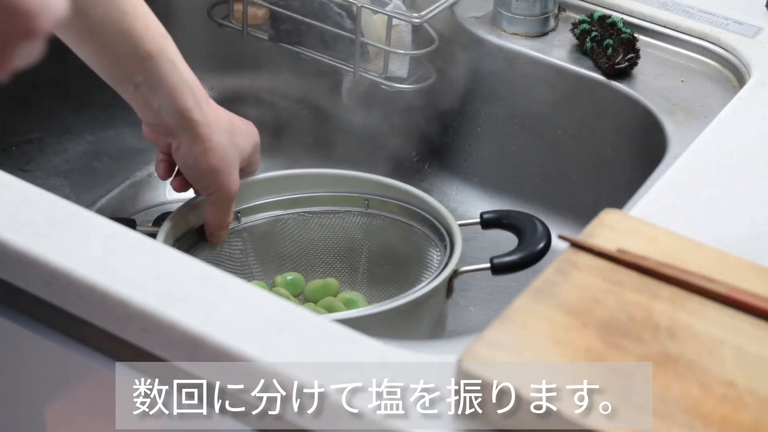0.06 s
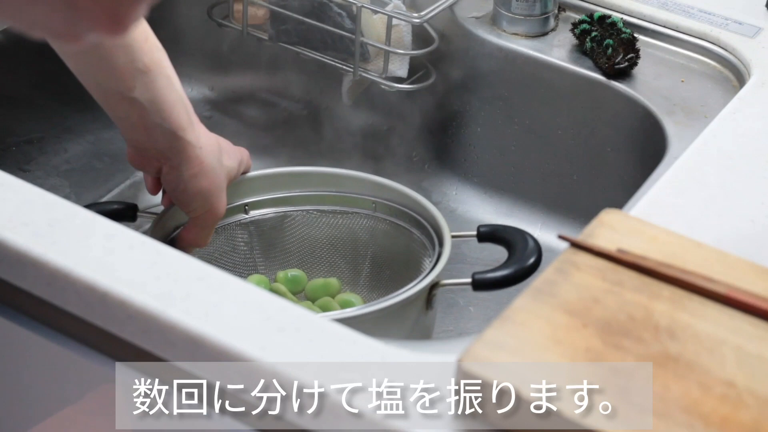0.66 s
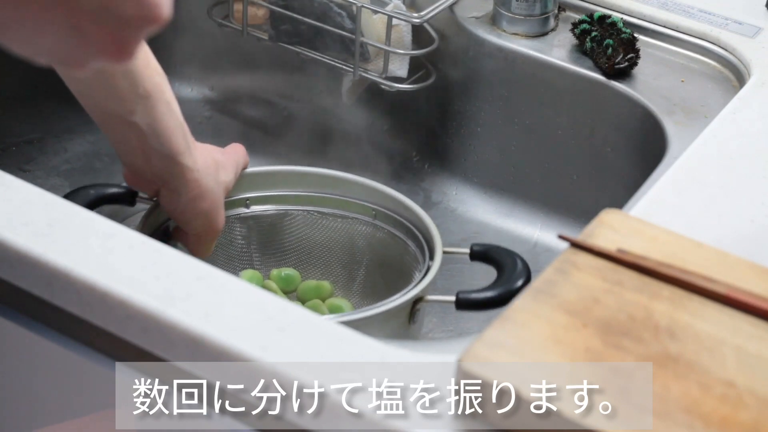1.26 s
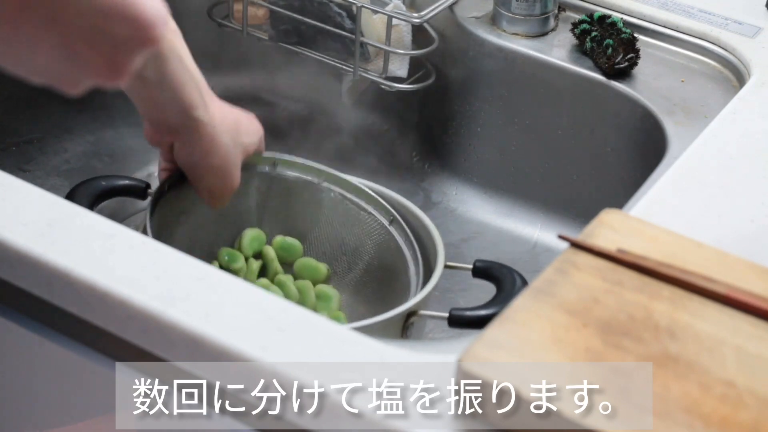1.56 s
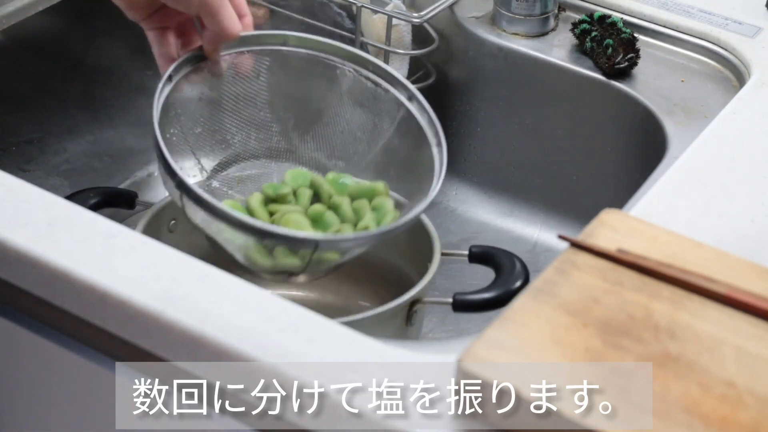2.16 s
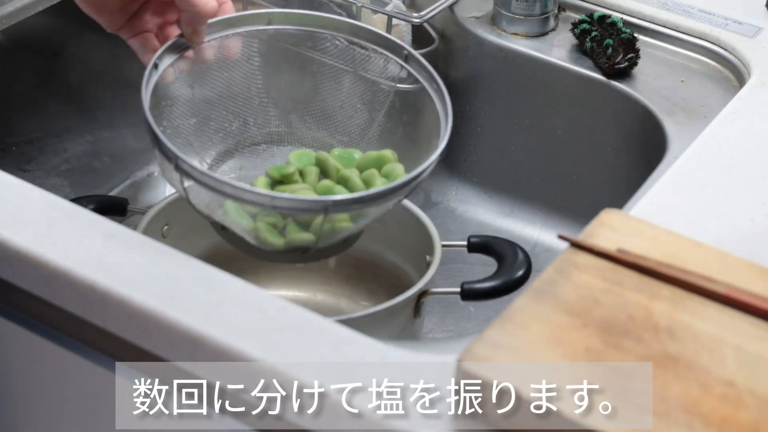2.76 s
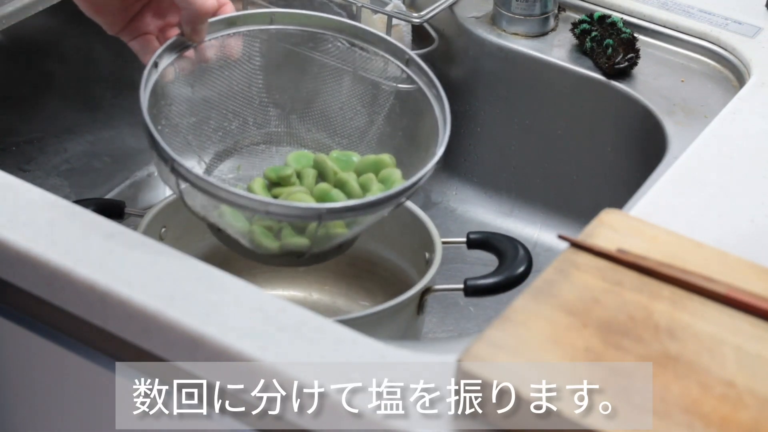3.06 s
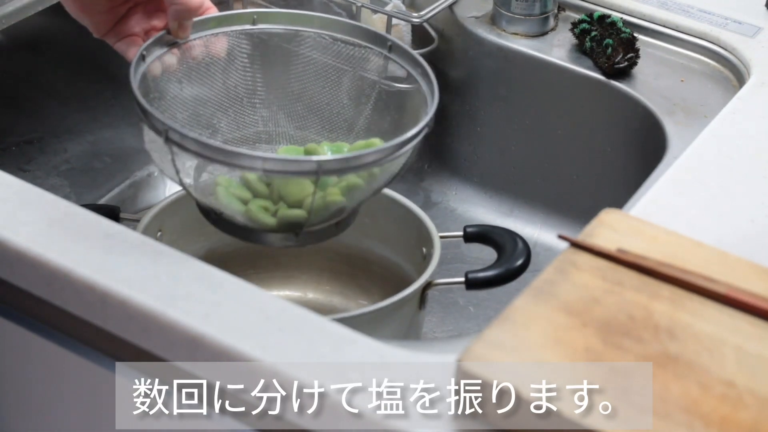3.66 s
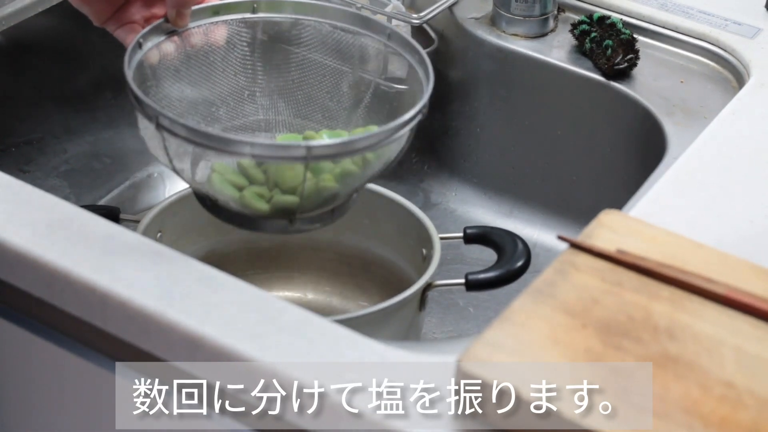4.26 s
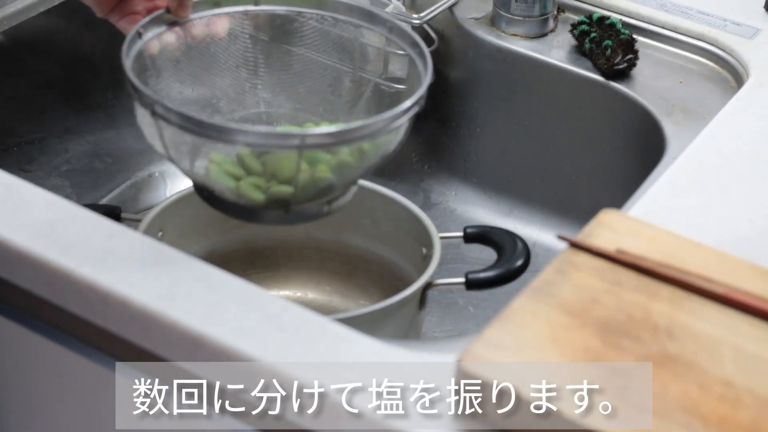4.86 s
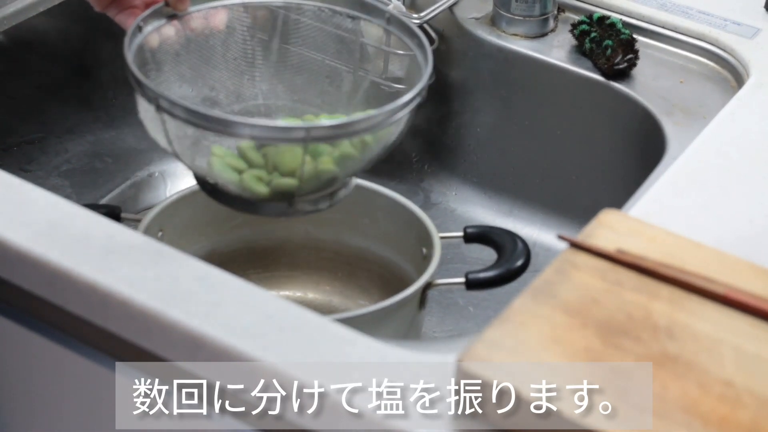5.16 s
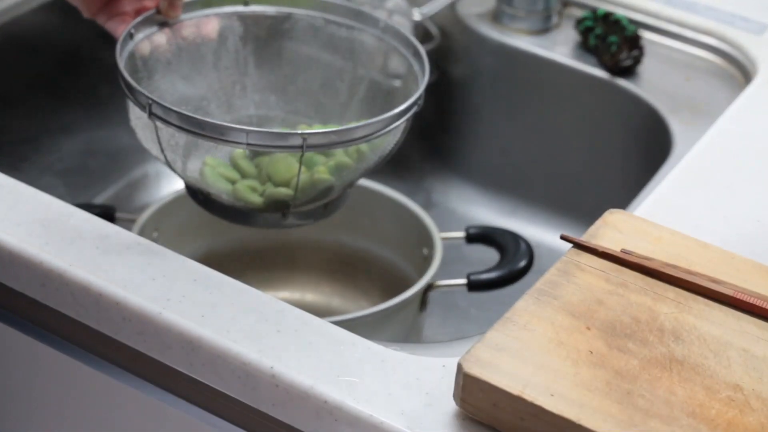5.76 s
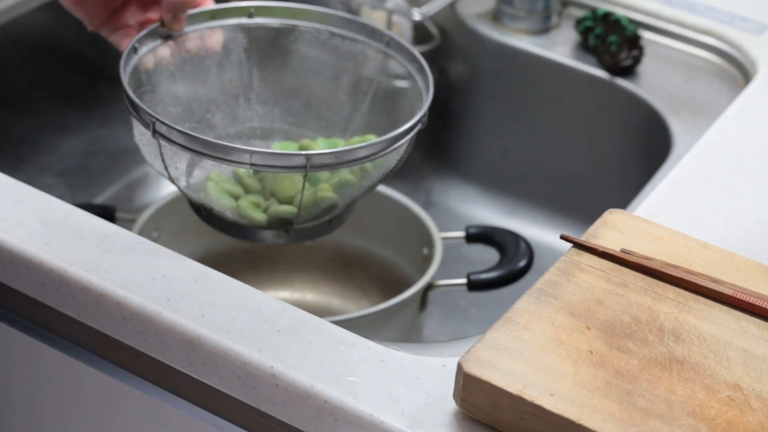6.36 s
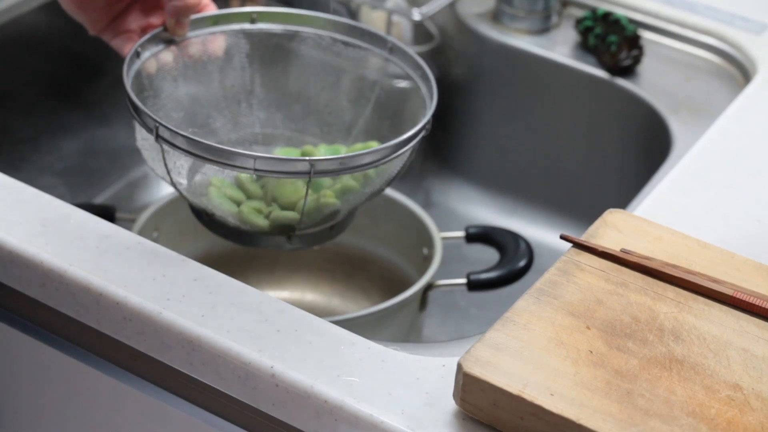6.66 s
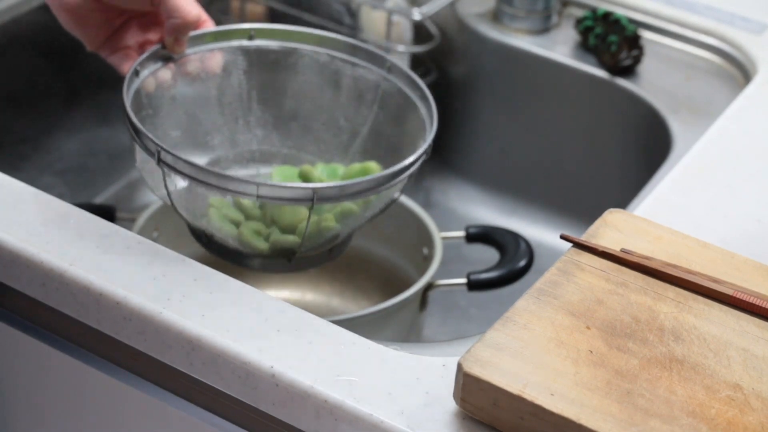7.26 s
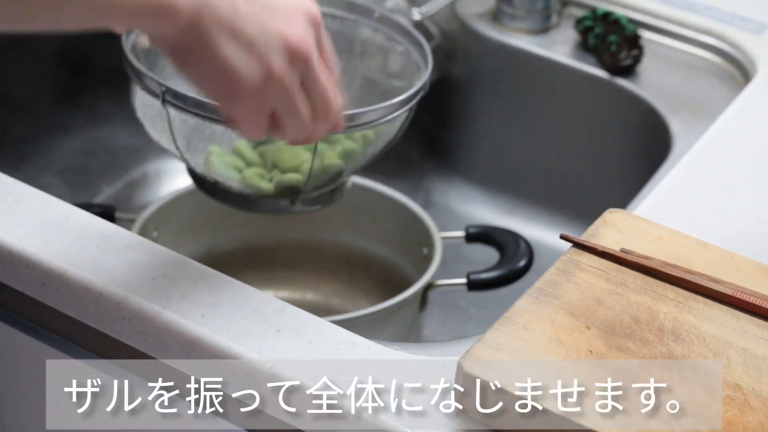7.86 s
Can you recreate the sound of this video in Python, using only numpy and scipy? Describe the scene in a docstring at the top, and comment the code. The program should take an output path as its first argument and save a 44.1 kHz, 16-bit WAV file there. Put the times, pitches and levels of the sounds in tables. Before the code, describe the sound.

A kitchen fan hums steadily, heard from one microphone above a steel sink. At the start a wire colander clinks and scrapes along a pot rim. From 0.5 to 2.7 seconds the overall level dips and the fan recedes, while the colander rasps and knocks with light sink thuds. The knocks are strongest between 0.8 and 2 seconds, the rim ringing as it lifts clear. From 2.7 seconds salt patters softly over boiled beans in several pinches, with occasional tiny rustles of beans shifting. Between 4.3 and 6.2 seconds handled plastic ticks and creaks, with a few soft low bumps. Dry snaps sound close by at 5.1 seconds, and the sharpest at 5.9. Around 7 seconds fingertips faintly rub off the salt. A last light sprinkle, a brief bean rustle and a tick come near 8 seconds.

```python
"""A kitchen, one microphone above a steel sink, a fan droning behind everything.
A wire colander of boiled beans is dragged round the rim of a pot, knocks against it and is lifted out;
mesh, hoop and pot ring, and the sink floor thuds. The level is down for about two seconds of the clatter.
Then salt is sprinkled over the beans in pinches of tiny impacts, while handled plastic ticks and creaks
and a few dry snaps sound close to the microphone."""
import sys
import numpy as np
from scipy import signal
from scipy.fft import rfft, irfft, next_fast_len
from scipy.io import wavfile

SR = 44100
rng = np.random.default_rng(int(sys.argv[2]) if len(sys.argv) > 2 else 0)


def pcm_store(signal):
    """Save signal as 16-bit PCM."""
    levels = np.round(np.clip(np.atleast_2d(signal), -1, 1) * 32767)
    wavfile.write(sys.argv[1], SR, levels.astype(np.int16).T)


N = 357651
TIME = np.arange(N) / SR


def from_db(db):
    """Decibels as an amplitude gain."""
    return 10 ** (np.asarray(db) / 20)


def rms_one(x):
    """The signal scaled to an rms of 1."""
    return x / np.sqrt(np.mean(x ** 2) + 1e-20)


def gain_curve(rows):
    """Rows of time_s, gain_db as a gain for every sample."""
    return from_db(np.interp(TIME, *np.transpose(rows)))


def gain_at(spectrum, hz):
    """Rows of frequency_hz, level_db as a gain at the given frequencies."""
    points_hz, db = np.transpose(spectrum)
    return from_db(np.interp(np.log(hz + 1), np.log(points_hz), db))


def colour(x, spectrum):
    """Give a signal a smooth spectrum; rms 1."""
    size = next_fast_len(len(x))
    gain = gain_at(spectrum, np.fft.rfftfreq(size, 1 / SR))
    return rms_one(irfft(rfft(x, size) * gain, size)[:len(x)])


def add(out, start_s, sound):
    """Mix a sound in at start_s."""
    start = int(np.clip(round(start_s * SR), 0, N - 1))
    out[start:start + len(sound)] += sound[:N - start]


def grains(per_s, spread_db):
    """Tiny impacts at random moments with uneven sizes."""
    sizes = from_db(spread_db * np.minimum(rng.exponential(1, N), 4))
    return sizes * rng.choice([-1, 1], N) * (rng.random(N) < per_s / SR)


def surges(per_s, depth_db):
    """A gain that wanders at random."""
    moments = np.arange(0, TIME[-1] + 1, 1 / per_s)
    return from_db(depth_db * np.interp(TIME, moments, rng.standard_normal(len(moments))))


def gesture(start_s, length_s, level_db, attack_s, release_t60, sag_db_per_s=0):
    """Gain of one movement of the hand: it swells, holds or eases off, and dies away."""
    t = np.maximum(TIME - start_s, 0)
    sag_db = sag_db_per_s * np.clip(t - attack_s, 0, length_s)
    release_db = 60 * np.maximum(t - length_s, 0) / release_t60
    return np.minimum(t / attack_s, 1) * from_db(level_db - sag_db - release_db)


def damped_body(x, resonances):
    """Broad, steep-sided resonances in parallel: they swell briefly and die at once."""
    out = 0
    for hz, width_hz, db in resonances:
        r = np.exp(-np.pi * width_hz / SR)
        gain = (1 - r * r) / 2
        section = [gain, 0, -gain, 1, -2 * r * np.cos(2 * np.pi * hz / SR), r * r]
        out = out + from_db(db) * signal.sosfilt([section, section], x + 1e-18)
    return out


def struck(modes, t, vary_db=1.5, split=0.00705):
    """Round metal rings in close pairs of modes; grip and place of contact vary pitch and strength."""
    out = 0
    for hz, db, t60 in modes:
        for pair_hz in hz * (1 + split * rng.standard_normal(2)):
            decay = from_db(db + vary_db * rng.normal() - 60 * t / t60)
            out = out + decay * np.sin(2 * np.pi * (pair_hz * t + rng.random()))
    return out / np.sqrt(2)


# Room tone, the rush of the fan's air: frequency_hz, density_db
AIR_SPECTRUM = [(20, -81), (45, -82.5), (100, -84), (160, -86.5), (260, -76.5), (560, -76), (800, -79.5),
                (1150, -78.5), (1400, -81.5), (2150, -81.5), (2500, -87.5), (4500, -93), (7500, -95),
                (15500, -109)]
# Fan and duct resonances: pitch_hz, width_hz, density_db
DUCT_HUMS = [(76.5, 15.5, -69), (108.3, 17.1, -56.5), (129.6, 14, -68), (192.2, 26, -65), (250, 10, -75.5),
             (281, 10.8, -66), (324.5, 32.6, -64.5), (405, 32, -71), (484, 44, -67), (550, 15.5, -70.5),
             (618.6, 9.5, -69.5), (851.4, 36, -73), (996, 16, -76.5), (1064, 20, -73.5), (1460, 4.5, -72),
             (1516, 26, -75.5), (1925, 4.4, -75), (2034, 8.6, -67.5), (2048, 26, -73.5), (2090, 13.7, -69),
             (2160, 5.7, -77.5), (2243, 9.1, -72)]


def fan():
    """In the background, turbulent air with the narrow hums of blades and duct standing out of it."""
    size = next_fast_len(N)
    hz = np.fft.rfftfreq(size, 1 / SR)
    power = gain_at(AIR_SPECTRUM, hz) ** 2
    for pitch_hz, width_hz, density_db in DUCT_HUMS:
        power = power + from_db(density_db) ** 2 * .5 ** ((2 * (hz - pitch_hz) / width_hz) ** 2)
    phases = np.exp(2j * np.pi * rng.random(len(hz)))
    return irfft(np.sqrt(power * size * SR / 2) * phases, size)[:N]


# Soft low bumps among the ticks: start_s, peak_db
LOW_BUMPS = [(4.67, -36), (4.776, -34), (4.917, -30.5), (5.52, -40), (5.859, -34)]
# Their one resonance: pitch_hz, width_hz, level_db
BUMP_RESONANCE = [(99, 29, 0)]


def bumps():
    """Dull nudges, each one low swell of a damped body."""
    out = np.zeros(N)
    bump = damped_body(signal.unit_impulse(SR // 4), BUMP_RESONANCE)
    for start_s, peak_db in LOW_BUMPS:
        add(out, start_s, from_db(peak_db) * bump / np.abs(bump).max())
    return out


# Soft ticks of handled plastic: start_s, peak_db
PLASTIC_TICKS = [(4.3203, -29.5), (4.405, -29), (4.4786, -27.5), (4.556, -27.5), (4.6282, -28.5),
                 (4.752, -36), (4.823, -30), (4.911, -31.5), (5.233, -32), (5.3235, -35), (5.597, -33.5),
                 (5.896, -28), (5.96, -36), (6.0617, -30), (6.121, -33), (6.191, -32.5), (6.204, -38),
                 (8.101, -29.5)]
# The plastic's resonances: pitch_hz, width_hz, level_db
PLASTIC_BODY = [(1200, 350, -1), (2070, 620, 2.5), (2480, 100, -2), (3640, 360, -3.5), (4157, 167, 2)]
# The thin ring of a rebound: pitch_hz, width_hz, level_db
REBOUND_RING = [(4170, 130, -3.5), (2640, 280, -3)]
# The same plastic creaking under strain: start_s, length_s, level_db
PLASTIC_CREAKS = [(4.49, .06, -47.5), (4.752, 0.076, -45.5), (5.223, .05, -42.5), (5.312, 0.13, -43.5),
                  (5.462, .16, -51.5)]


def plastic(rattle_db=-25.5, rattle_t60=0.073, rebound_s=.012):
    """Plastic sticks and slips: single ticks that rattle and rebound, and creaks between them."""
    out, t = np.zeros(N), np.arange(SR // 16) / SR
    rebound = damped_body(signal.unit_impulse(len(t), int(rebound_s * SR)), REBOUND_RING)
    for start_s, peak_db in PLASTIC_TICKS:
        contact = rng.standard_normal(len(t)) * from_db(rattle_db - 60 * t / rattle_t60)
        contact[0] = 1
        tick = damped_body(contact, PLASTIC_BODY) + rebound
        add(out, start_s, from_db(peak_db) * tick / np.abs(tick).max())
    strain = sum(gesture(*creak, attack_s=.012, release_t60=0.14, sag_db_per_s=9)
                 for creak in PLASTIC_CREAKS)
    creaking = rms_one(damped_body(grains(per_s=600, spread_db=-0.5), PLASTIC_BODY))
    return out + strain * creaking


# Sharp dry snaps close to the microphone: start_s, peak_db, upper_resonances_db, ring_db
CLOSE_SNAPS = [(5.1082, -25, 1, -4), (5.111, -24, 0, -4), (5.1199, -16.5, 13, 5), (5.122, -18.5, 8, 14.5),
               (5.1517, -15.5, -1, -10), (5.9317, -6.5, 2.5, 0.5)]
# The body that snaps, lowest resonance first: pitch_hz, width_hz, level_db
SNAP_RESONANCES = [(1290, 160, -3), (2080, 760, 2.5), (3610, 560, -8), (5400, 900, -15.5), (6600, 670, -22)]
# Reflections off nearby surfaces: delay_s, level_db
NEAR_REFLECTIONS = [(.0014, -33), (.0029, -16), (.0043, -19), (.0058, -15), (.007, -11.5)]


def snaps(ring_hz=2660, ring_width_hz=120):
    """Close up, hard clicks in a damped body, each with a brief hollow ring and first reflections."""
    out, click = np.zeros(N), signal.unit_impulse(SR // 20)
    reflected = click.copy()
    for delay_s, level_db in NEAR_REFLECTIONS:
        reflected[int(delay_s * SR)] += from_db(level_db)
    lowest, *upper = SNAP_RESONANCES
    for start_s, peak_db, upper_db, ring_db in CLOSE_SNAPS:
        body = [lowest] + [(hz, width_hz, db + upper_db) for hz, width_hz, db in upper]
        snap = damped_body(reflected, body) - damped_body(click, [(ring_hz, ring_width_hz, ring_db)])
        add(out, start_s, from_db(peak_db) * snap / np.abs(snap).max())
    return out


# Beans shifting over the wires: start_s, level_db, length_s, sizzle_share
BEAN_SLIPS = [(2.763, -48.5, 0.022, 0.15), (2.881, -48.5, .02, 0.3), (3.075, -52.5, 0.02, 0.4),
              (4.39, -45, .03, .1), (4.972, -48, 0.014, 0.3), (6.139, -50, .02, 0),
              (6.264, -47.5, 0.022, 0), (7.545, -48.5, 0.037, 0.1), (7.638, -49, 0.02, 0),
              (7.87, -39, 0.02, 0.77), (8.08, -50, 0.0065, .2)]
# Their rustle: frequency_hz, level_db
RUSTLE_SPECTRUM = [(2000, -25), (4000, -2), (5500, -3), (7000, 4), (8500, 0.5), (10000, -11), (16000, -30)]
# Their finer sizzle: frequency_hz, level_db
SIZZLE_SPECTRUM = [(2000, -28), (4000, -10), (6800, 1), (8500, -5), (10500, 1), (12000, -16), (13000, -10),
                   (16000, -23)]


def beans(rise_s=0.0038, tail_t60=0.14):
    """Beans slip a little: a short bright rustle that dies in the sink."""
    rustle = colour(grains(per_s=3900, spread_db=2.0), RUSTLE_SPECTRUM)
    sizzle = colour(grains(per_s=5000, spread_db=1.0), SIZZLE_SPECTRUM)
    out = 0
    for start_s, level_db, length_s, sizzle_share in BEAN_SLIPS:
        slip = gesture(start_s, length_s, level_db, rise_s, tail_t60)
        out = out + slip * (np.sqrt(1 - sizzle_share) * rustle + np.sqrt(sizzle_share) * sizzle)
    return out


# Pinches of salt over the beans: start_s, length_s, relative_db
SALT_PINCHES = [(2.72, 0.82, -52.5), (3.52, 1.18, -47), (4.95, 1.02, -47.5), (6.3, 0.67, -51),
                (7.54, 0.091, -54), (7.93, .17, -53.5)]
# Crystals landing below the microphone: frequency_hz, level_db
SALT_SPECTRUM = [(2000, -16), (4000, -9), (5200, -5.5), (6500, -1), (7600, 1.5), (9000, -5.5),
                 (11000, -13.5), (13000, -17), (16000, -21)]
# Fingertips rubbing off the last salt: frequency_hz, level_db
FINGERTIP_SPECTRUM = [(1800, -20), (2600, -2), (3100, -1), (3500, -8), (4200, 1), (4700, -26), (5800, -1),
                      (6500, 2), (7300, -3), (8200, -4), (10000, -20), (16000, -51)]


def salt(gain_db=-2.0, coarse_db=-11.5):
    """Fine crystals fall in spurts and a few coarse ones tick; the last are rubbed off the fingers."""
    trickle = (2.72, 3.2, -51)   # stray crystals between the first pinches, same columns
    pinches = [gesture(*pinch, attack_s=.08, release_t60=0.58) for pinch in [*SALT_PINCHES, trickle]]
    flow = from_db(gain_db) * np.max(pinches, axis=0) * surges(per_s=35, depth_db=2.0)
    fine = rms_one(grains(per_s=7000, spread_db=2.5))
    coarse = from_db(coarse_db) * rms_one(grains(per_s=120, spread_db=6.0))
    rubbing = gesture(start_s=7.0, length_s=.33, level_db=-51, attack_s=0.12, release_t60=0.7)
    rubbing *= surges(per_s=30, depth_db=3.5)
    grit = colour(grains(per_s=4000, spread_db=1.5), FINGERTIP_SPECTRUM)
    return flow * colour(fine + coarse, SALT_SPECTRUM) + rubbing * grit


def hand_weight():
    """How firmly the hand presses the pot onto the sink floor, 0-1."""
    return gesture(start_s=0.485, length_s=1, level_db=-1, attack_s=.08, release_t60=1.1)


# The sheet steel of the sink floor, under the pot: pitch_hz, width_hz, level_db
SINK_FLOOR = [(136, 70, 1.5), (228, 88, 1), (517, 370, -3)]


def pot_rumble(gain_db=-45.5):
    """The pot's base grinds softly on the sink floor while the hand leans on it."""
    grinding = rms_one(damped_body(grains(per_s=600, spread_db=3.0), SINK_FLOOR))
    return from_db(gain_db) * hand_weight() * grinding


# The dense ring of wire mesh and sink: frequency_hz, level_db
MESH_SPECTRUM = [(100, -10.5), (300, -23), (550, -10.5), (1150, -2.5), (1450, -5.5), (1950, -6), (2500, -6),
                 (3500, -7), (4600, -1.5), (7000, 1.5), (8300, -1.5), (10000, -12.5), (12000, -19.5),
                 (16000, -32)]
# Modes of the pot: pitch_hz, level_db, t60_s
POT_RING = [(504, -15.5, 0.29), (540, -7, 0.24), (650, -11, 0.2), (698, -12.5, 0.33), (907, -6.5, 0.28),
            (1119, 1.5, 0.19), (1168, -8.5, 0.27), (1228, -10, 0.32), (1810, -10.5, 0.24),
            (1950, -10, 0.27), (2260, -16, .16), (2750, -13, 0.24), (3470, -18, .14), (5850, -2, 0.17),
            (6490, -18, 0.16), (6900, -17, 0.16), (8050, -10, 0.13), (8400, -13, 0.13), (9300, -13, 0.11),
            (9400, -17, 0.13)]
# Modes of the colander's rim hoop: pitch_hz, level_db, t60_s
HOOP_RING = [(3933, -4, 0.24), (4120, -7, 0.27), (4200, -8, 0.28), (4536, -6, .17), (4830, 1, 0.15),
             (5350, -5.5, 0.15), (6200, -6, .15), (7490, 3, 0.14)]


def metal_ring(low_db, clank_db, hoop_db, modes_db=-6.0, mesh_t60=0.22, crack_db=3.0, crack_t60=0.018):
    """Answer to one contact: a short crack, the dense ring of mesh and sink, the modes of pot and hoop."""
    t = np.arange(SR // 2) / SR
    mesh = colour(rng.standard_normal(len(t)), MESH_SPECTRUM)
    mesh *= from_db(-60 * t / mesh_t60) + from_db(crack_db - 60 * t / crack_t60)
    modes = struck(POT_RING, t) + from_db(hoop_db) * struck(HOOP_RING, t)
    ring = mesh + from_db(modes_db) * modes
    # the place of contact decides how much of the pot wall answers
    low = signal.sosfilt(signal.butter(1, [450, 1400], "band", fs=SR, output="sos"), ring)
    clank = signal.sosfilt(signal.butter(1, [2200, 3200], "band", fs=SR, output="sos"), ring)
    return ring + (from_db(low_db) - 1) * low + (from_db(clank_db) - 1) * clank


# Pushes of the colander's rim along the pot: start_s, swell_s, length_s, level_db
RIM_PUSHES = [(0.063, .12, 0.36, -38.5), (.51, .05, .06, -44), (0.627, .03, 0.098, -46),
              (.91, .04, .09, -45), (1.125, 0.013, 0.052, -28.5), (1.333, 0.027, 0.15, -36.5),
              (1.475, 0.026, 0.086, -29.5), (1.575, .02, .03, -26), (1.931, 0.048, 0.075, -28.5),
              (2.64, .03, .05, -49)]
# How freely the hoop rings as it is drawn out over the edge of the pot: time_s, gain_db
HOOP_RELEASE = [(1.3, -25), (1.5, -8), (1.8, 3.5), (2.05, 3), (2.25, -4)]


def colander_slide(singing_db=-6.5):
    """With each push dense slips of the rim rasp and keep the metal ringing; the freed hoop sings."""
    # the rim rests lightly on the pot until it is lifted clear
    effort = gesture(start_s=0.48, length_s=1.6, level_db=-49, attack_s=.03, release_t60=.45)
    for start_s, swell_s, length_s, level_db in RIM_PUSHES:
        push = gesture(start_s, length_s, level_db, swell_s, release_t60=0.26, sag_db_per_s=28)
        effort = np.hypot(effort, push)
    slips = grains(per_s=3500, spread_db=3.5)
    ring = metal_ring(low_db=3.0, clank_db=1.5, hoop_db=3.5, modes_db=-8.5)
    ringing = rms_one(signal.fftconvolve(slips, ring)[:N])
    rasp = rms_one(ringing + colour(slips, MESH_SPECTRUM))
    hoop = signal.fftconvolve(slips, struck(HOOP_RING, np.arange(SR // 2) / SR))[:N]
    singing = from_db(singing_db) * gain_curve(HOOP_RELEASE) * rms_one(hoop)
    return effort * (rasp + singing)


# Colander against pot, below the microphone: start_s, level_db, chatter_s, low_ring_db, clank_db
RIM_KNOCKS = [(0.001, -36.5, .008, 4, 14), (0.086, -43, .002, -17, -7), (0.471, -47.5, .005, 7, 3),
              (0.604, -36.5, .003, 7.5, -4), (0.806, -38, .003, -8, -1), (.852, -23.5, 0.0038, -3, 12),
              (0.8577, -17.5, 0.0075, -5, 4), (1.008, -40, .015, -3, 25), (1.068, -43.5, .002, -10, 0),
              (1.136, -28.5, .02, 6, 14), (1.178, -31, .012, 18, -2), (1.247, -31.5, .002, -10, -1),
              (1.268, -19, .007, 8, 6), (1.505, -20.5, .004, -19, -3), (1.6, -15.5, .003, 2, -1),
              (1.746, -30, .005, 8, 2), (1.79, -28, .004, -10, -15), (1.821, -16, 0.0022, 4, -13),
              (1.879, -27.5, .012, 7, 2), (1.971, -31, .03, -2, -11), (2.306, -47.5, .002, -10, 0),
              (2.407, -47, .002, -10, -2)]


def sink_thuds(relative_db=-14, t60_s=0.2, onset_s=0.02):
    """While the pot is pressed down, each knock passes through it into the sink floor."""
    out, t = np.zeros(N), np.arange(SR // 4) / SR
    for start_s, level_db, *_ in RIM_KNOCKS:
        thud = damped_body(rng.standard_normal(len(t)) * from_db(-60 * t / t60_s), SINK_FLOOR)
        add(out, start_s, from_db(level_db + relative_db) * thud / np.std(thud[:int(onset_s * SR)]))
    return hand_weight() * out


def colander_knocks(chatter_per_s=1200, onset_s=0.021):
    """Each knock is a first touch and a brief chatter of the rim, which set the metal ringing."""
    out, t = np.zeros(N), np.arange(SR // 16) / SR
    for start_s, level_db, chatter_s, low_db, clank_db in RIM_KNOCKS:
        contact = rng.standard_normal(len(t)) * (rng.random(len(t)) < chatter_per_s / SR)
        contact *= t < chatter_s
        contact[0] = 1
        hoop_db = np.interp(start_s, *np.transpose(HOOP_RELEASE))
        knock = signal.fftconvolve(contact, metal_ring(low_db, clank_db, hoop_db))
        add(out, start_s, from_db(level_db) * knock / np.std(knock[:int(onset_s * SR)]))
    return out


def scene():
    """Everything as it reaches one microphone above the sink, before the level is turned down."""
    colander = colander_slide() + pot_rumble() + colander_knocks() + sink_thuds()
    seasoning = salt() + beans()
    handling = snaps() + plastic() + bumps()
    return (fan() + colander + seasoning + handling)[None]


# The whole sound is turned down for a while: time_s, gain_db
LEVEL_DIP = [(.485, 2), (.489, -15), (2.718, -16.5), (2.722, 1.5)]


def record(dry):
    """The whole sound is turned down during the clatter, and a steep low-pass cuts the highest treble."""
    cutoff_hz = 15680
    lowpass = signal.ellip(12, .1, 80, cutoff_hz, fs=SR, output="sos")
    return signal.sosfilt(lowpass, dry * gain_curve(LEVEL_DIP))


dry = scene()
out = record(dry)
pcm_store(out)
```